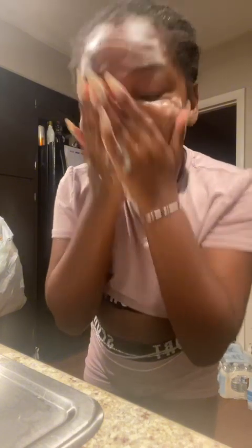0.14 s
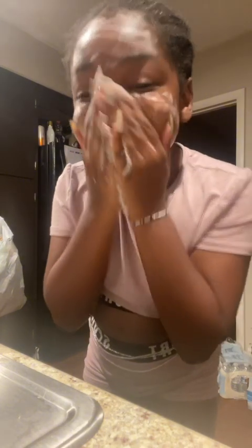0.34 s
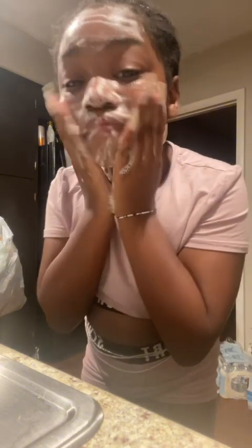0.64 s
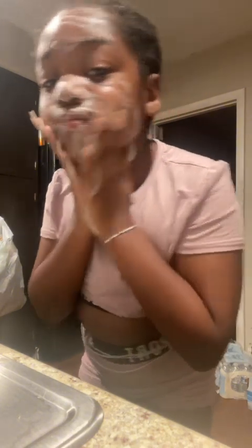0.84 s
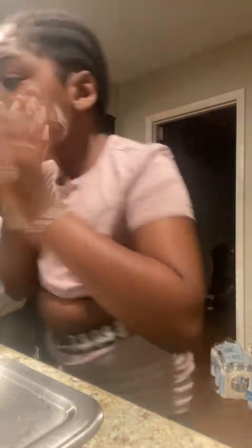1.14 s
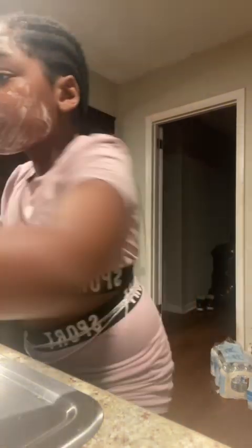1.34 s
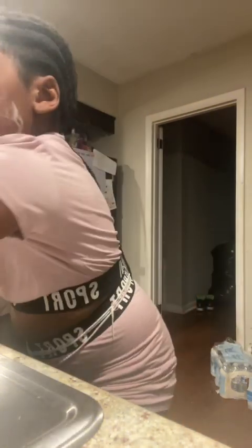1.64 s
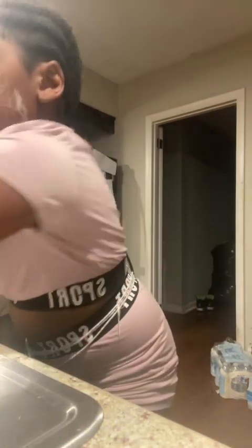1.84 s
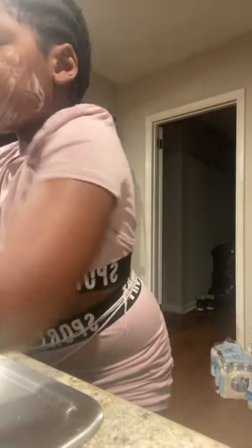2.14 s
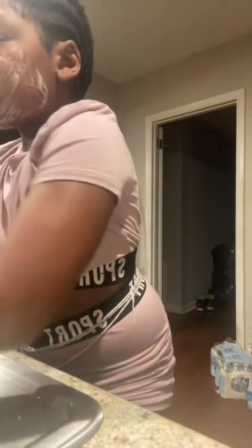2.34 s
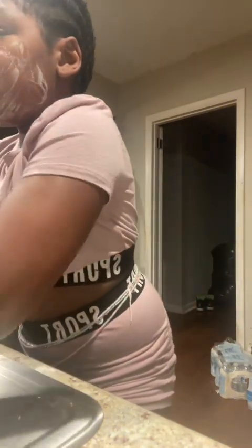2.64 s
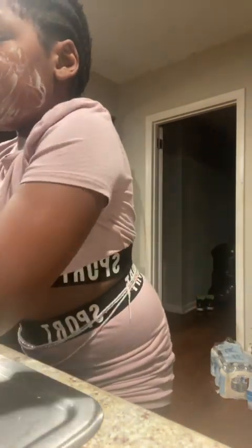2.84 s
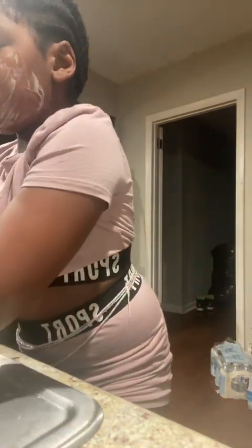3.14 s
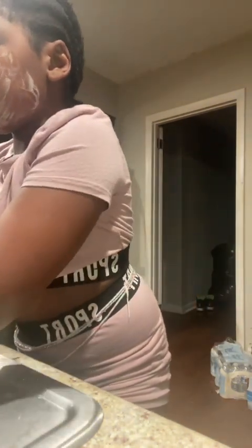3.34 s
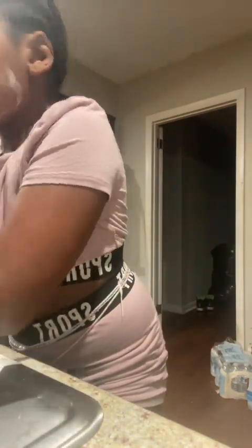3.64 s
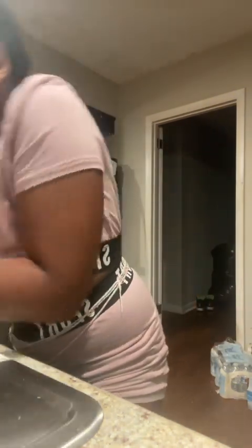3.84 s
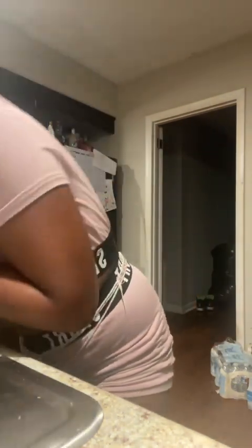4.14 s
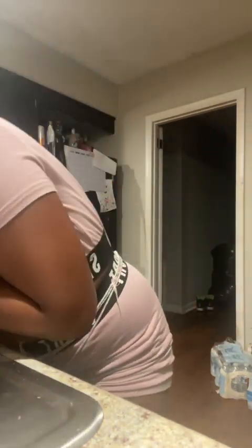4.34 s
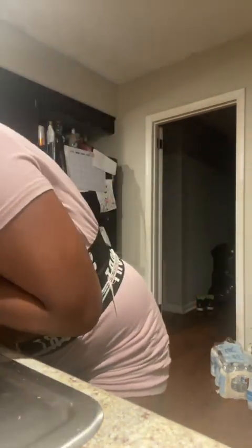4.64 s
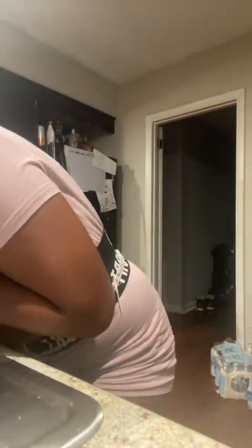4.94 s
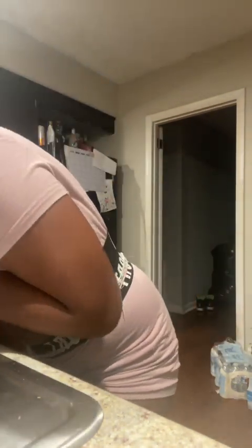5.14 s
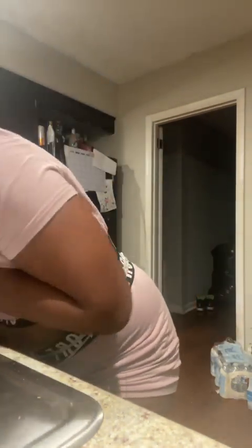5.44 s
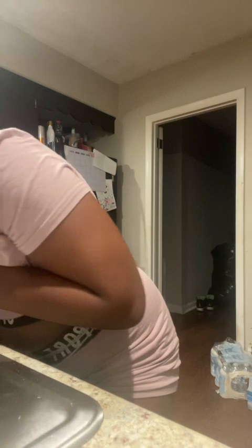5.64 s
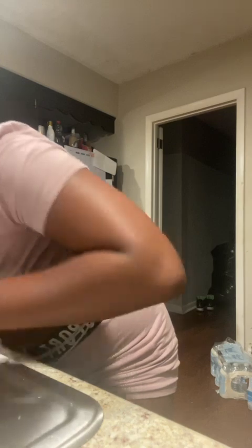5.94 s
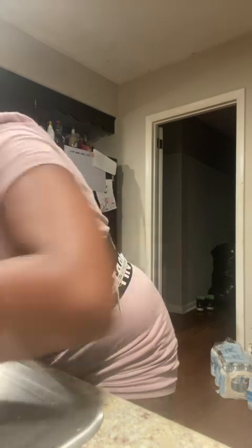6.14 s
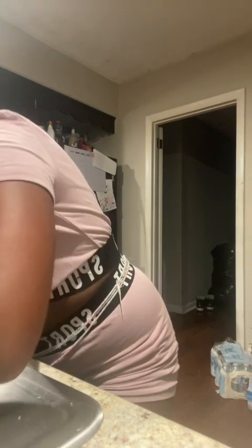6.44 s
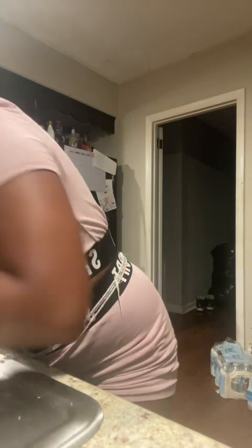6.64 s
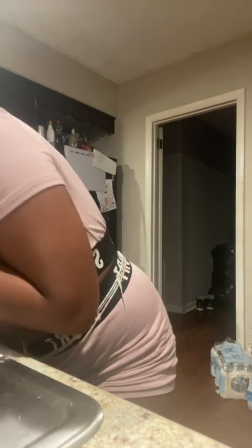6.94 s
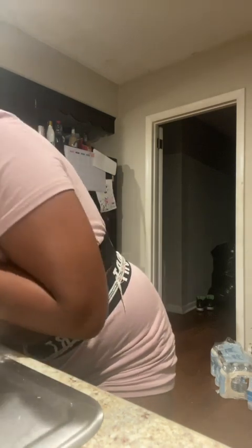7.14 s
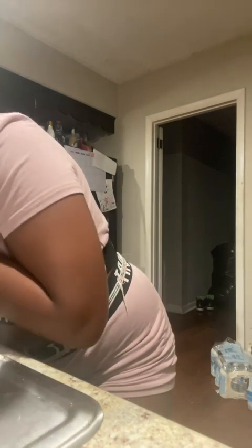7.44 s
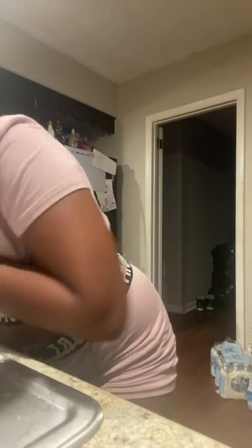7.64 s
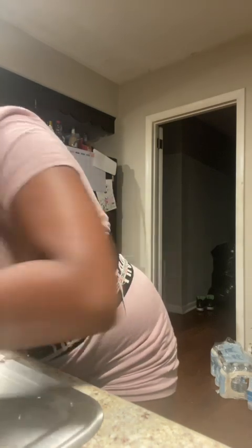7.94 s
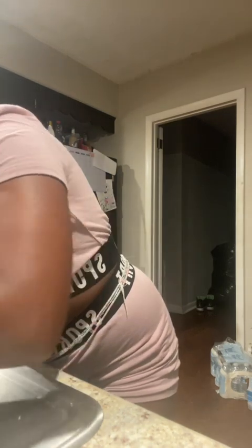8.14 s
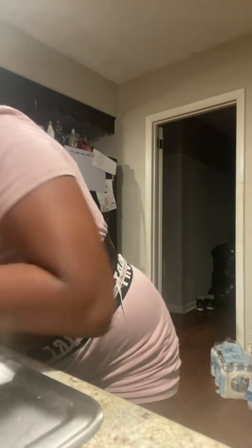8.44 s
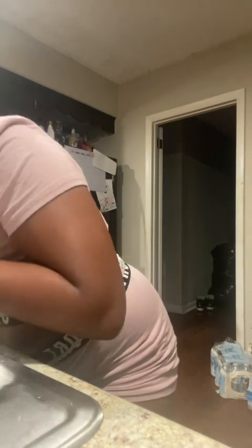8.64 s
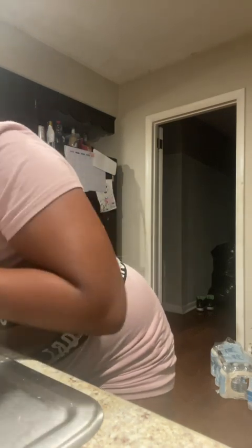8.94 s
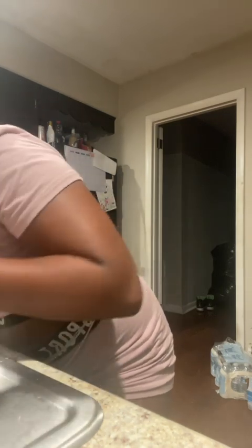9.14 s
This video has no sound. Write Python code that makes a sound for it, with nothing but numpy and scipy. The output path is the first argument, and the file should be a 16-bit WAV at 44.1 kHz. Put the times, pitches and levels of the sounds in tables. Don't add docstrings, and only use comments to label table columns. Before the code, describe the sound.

After a quiet fridge hum, a kitchen tap clunks open and water drums into a steel sink, with handfuls slapping and sloshing down.

```python
import sys
import numpy as np
from scipy import signal
from scipy.io import wavfile
from scipy.ndimage import uniform_filter1d

SR = 44100
rng = np.random.default_rng(int(sys.argv[2]) if len(sys.argv) > 2 else 0)


def convert_level_to_amplitude(level_db):
    exponent = np.asarray(level_db, float) / 20
    return 10 ** exponent


def dump(signal):
    limited = np.clip(np.atleast_2d(signal).T, -1, 1)
    pcm = np.round(limited * 32767).astype(np.int16)
    wavfile.write(sys.argv[1], SR, pcm)


N = 409640

# frequency in Hz, level in dB per Hz.
SPRAY_COLOUR = [(2060, -30), (3500, -1), (5280, -11.5), (5960, -20.5), (8640, -22.5), (9220, -31.5),
                (12300, -30), (14900, -16), (15800, -12.5)]
# pitch in Hz, width in Hz, level in dB.
BASIN_MODES = [(85, 15, -14), (115.5, 14.6, -1.5), (179.5, 21.4, -6), (244.2, 22, -6), (327, 30, -11.5),
               (388, 15.8, -2), (453.2, 20.3, 2), (502.6, 21, -1), (573, 40, -11), (631, 34, -6.5),
               (670, 24, -9.5), (789.7, 73, -7.5), (926, 37, -18.5), (976, 21.7, -8), (1064.3, 15.3, -10),
               (1119.5, 63, -10), (1306, 35, -16), (1409, 45, -17.5), (1511.5, 50, -13.5), (1584, 50, -14),
               (1738, 83, -25), (1884, 42, -21.5), (2103, 250, -33.5), (2401, 74, -30), (2643, 73, -24),
               (2867, 73, -31.5), (3010, 56, -31.5), (3276, 97, -37), (3625, 160, -43), (3850, 76, -49)]
# pitch in Hz, width in Hz, level in dB.
BOOM_MODES = [(113, 74, -5), (382, 73, 1.5), (668, 97, -0.5), (1175, 42, -14), (1480, 290, -17),
              (2300, 390, -25.5), (2645, 100, -28)]
# pitch in Hz, width in Hz, level in dB.
LEVER_MODES = [(102.3, 62, -5), (398, 133, 8.5), (620, 62, 2), (980, 250, -9), (1500, 600, -17.5),
               (2900, 920, -45)]
# start in seconds, slap peak in dB, then droplets and mist
# in dB relative to the slap.
DUMPS = [(3.866, -51, -10, -20), (3.918, -49, -21, -29), (3.9306, -66, 3, -4), (3.954, -47, -15, -13),
         (3.989, -62, 1, -3), (4.019, -45, -17, -21), (4.212, -48.5, -9, -16), (4.350, -52, -14, -22),
         (4.39, -60, -3, 0), (4.434, -37.5, -21, -21), (4.419, -32, -28, -34), (4.497, -49, -9, -11),
         (5.0796, -44, -27, -21), (5.319, -50, -24, -29), (5.364, -64, 0, -11), (5.406, -53, -9.5, -19),
         (5.446, -59, -7.5, 1), (5.4575, -47, -15, -26.5), (5.464, -52, 3, -8), (5.4915, -31, -19, -17),
         (5.523, -36, -20, -32), (5.546, -67.5, 0, -2), (6.474, -51.5, -25, -26), (6.595, -47, -11, -23),
         (6.679, -51.5, -21, -34), (6.74, -45, -13, -4), (7.072, -46.5, -25, -27), (7.1265, -48, -22, -22),
         (8.39, -58, -12, -10), (8.427, -50, -8, -24)]
# start in seconds, slap
# peak in dB, then droplets and mist
SPITS = [(1.509, -70.5, 3, -20), (1.757, -47.5, -19, -4), (1.9166, -57, -13, -22), (1.9534, -59, 4, 16),
         (2.041, -49, -10, -12), (2.148, -65, 3, 6), (2.161, -62, 9, -7), (2.263, -63, -3, -12),
         (2.2795, -50, -20, -28), (2.333, -60, -3, -17), (2.394, -49, -20, -32), (2.459, -60, 0, -19),
         (2.515, -55, -16, -25), (2.587, -45, -13, -30), (2.6024, -42, -22, -42), (2.756, -61, -2, -18),
         (2.828, -43, -23, -21), (2.855, -59, -2, -9), (2.914, -46.5, -20, -30), (2.924, -62, 5, -8),
         (2.983, -63, -1, -12), (3.024, -59, -1, -7), (3.241, -47, -18, -29), (3.32, -65, 0, -17),
         (3.605, -67, -6, 7), (3.6735, -66, 7, -12), (3.842, -65, -6, 2), (4.29, -46, -7, -39),
         (8.216, -69, 4, -13)]
# slap pitch in Hz at about -50 dB, Hz higher per dB, thud in dB
# relative to the slap, time to fall 60 dB in seconds.
ON_HANDS = (3200, 43.5, -10, 0.13)
ON_STEEL = (3220, 9.2, 8.4, 0.024)
# start in seconds, length in seconds, level in dB,
# upper against lower boom in dB, counter rumble in dB.
SLOSHES = [(1.905, 0.046, -20, -7, -30), (3.86, 0.12, -24.5, 2, -36), (4.07, 0.03, -27.5, 5, -29.5),
           (4.18, 0.26, -31, 4.5, -40), (4.36, 0.15, -24, 2, -29), (4.98, 0.12, -29, 0.5, -41.5),
           (5.33, 0.072, -30, -2.5, -42), (5.39, 0.05, -24, -10.5, -34), (5.46, 0.049, -19.5, -10, -28.5),
           (6.67, 0.068, -27, 3.5, -41.5), (6.725, 0.061, -24.5, -6.5, -32.5),
           (7.05, 0.11, -29.5, 7, -31.5), (8.28, 0.08, -27, 2, -41), (8.38, 0.16, -28, 4.5, -34)]
# start in seconds, length in seconds, level in dB,
# upper against lower modes in dB, counter rumble in dB.
RATTLES = [
    (1.51, 0.023, -20, 2.5, -19),
    (1.56, 0.027, -40, 6, -27),
    (1.61, 0.046, -30, 1, -22),
    (1.68, 0.093, -36.5, 8, -29),
]
# start in seconds, peak in dB, pitch in Hz.
KNOCKS = [(1.918, -9.5, 545), (1.931, -11.5, 596), (1.924, -16, 600), (1.942, -16.5, 494),
          (1.949, -14, 562), (1.955, -15, 422), (1.963, -16, 382), (3.928, -19.5, 514), (4.008, -14.5, 615),
          (4.216, -14.5, 682), (4.349, -16.5, 670), (4.377, -7, 652), (4.419, -20, 670),
          (4.438, -12.5, 674), (4.446, -14, 600), (4.453, -19, 560), (4.5, -18, 382), (4.994, -23.5, 554),
          (5.019, -17.5, 398), (5.082, -11.5, 364), (5.32, -17, 637), (5.415, -6, 370), (5.424, -14, 400),
          (5.434, -16.5, 380), (5.466, -13.5, 640), (5.485, -17, 620), (5.493, -3.5, 655),
          (6.742, -16, 500), (6.762, -20, 400), (6.787, -20, 400), (6.776, -19, 417), (7.074, -22, 668),
          (7.083, -20, 600), (7.128, -12.5, 637), (8.305, -21, 390), (8.322, -22, 420), (8.33, -19, 400),
          (8.416, -21, 480), (8.545, -22, 450), (8.408, -18, 645), (8.464, -18.5, 523)]
# start in seconds, peak in dB, pitch in Hz.
CLUNKS = [(1.510, -29, 700), (1.522, -17, 448), (1.531, -21, 563), (1.539, -20, 440), (1.548, -24, 498),
          (1.570, -29, 634), (1.618, -19.5, 560), (1.644, -25, 620), (1.7455, -12, 637), (1.7495, -7, 583)]
# start in seconds, peak in dB, pitch in Hz,
# time to fall 60 dB in seconds.
THUMPS = [(0.972, -30.5, 221, 0.1), (1.757, -18, 350, 0.06), (0.983, -21.5, 80.5, 0.13),
          (1.104, -23, 52.4, 0.08), (1.498, -18, 69.4, 0.07), (1.558, -3.5, 70.5, 0.072),
          (1.599, -19.5, 51.5, 0.24), (1.643, -15.5, 112.3, 0.19), (1.987, -23, 101.4, 0.13),
          (2.05, -22, 105, 0.097), (2.15, -21, 113, 0.13), (4.436, -25, 123, 0.24), (5.514, -21, 113, 0.29)]
# start in seconds, peak in dB, pitch in Hz, width in Hz.
FIZZ = [(1.56, -68, 12000, 300), (1.645, -70, 12000, 297), (1.759, -60, 8550, 1300),
        (4.4983, -54, 9450, 1900), (5.4915, -57, 10600, 1500), (5.466, -44, 5900, 1500),
        (5.4915, -52, 13200, 1500), (6.743, -54, 5600, 900), (6.745, -34, 1100, 700),
        (4.43, -42, 2600, 1500), (4.415, -56, 6500, 2500), (8.39, -58, 5500, 1500),
        (8.428, -42, 6000, 1600), (2.603, -36, 3700, 800), (3.6735, -57.5, 7800, 900),
        (6.598, -59, 7600, 1500), (1.9, -42, 1700, 1400), (1.8, -38, 1150, 960), (6.742, -61, 9000, 2000),
        (4.42, -31.5, 4000, 1700), (8.309, -53, 4100, 700), (5.524, -55, 8300, 1800),
        (4.438, -44, 5000, 1200), (1.62, -40.5, 1000, 810), (1.646, -41, 1100, 900),
        (1.92, -36, 1300, 1200), (4.292, -47, 4800, 1300)]
# start in seconds, peak in dB, pitch in Hz,
# width in Hz.
TICKS = [(1.510, -50, 2500, 400), (1.524, -46.5, 2900, 500), (1.7447, -36, 1720, 900),
         (1.763, -43, 3200, 900), (1.9537, -50, 9500, 5000), (1.954, -46, 15000, 2500),
         (4.3901, -56, 15100, 2000), (6.7405, -50, 14200, 2500), (2.0385, -58, 8000, 4000),
         (2.1472, -58, 7000, 4000), (2.602, -36, 3750, 700), (2.8297, -44, 3600, 900),
         (2.874, -54, 6500, 2500), (2.925, -52, 5500, 1500), (4.3762, -38, 2400, 1500),
         (4.415, -51, 6000, 3000), (4.4202, -26, 3300, 2200), (4.437, -36, 2600, 1500),
         (4.4984, -56, 11000, 6000), (5.0796, -41, 2360, 1800), (5.319, -40, 2000, 1500),
         (5.4647, -27, 2290, 900), (5.465, -43, 5500, 3000), (5.4911, -30, 2600, 2500),
         (5.4915, -45, 12000, 6000), (5.5231, -29, 1900, 1800), (5.5235, -43, 4500, 3000),
         (5.547, -50, 15500, 1500), (6.596, -54, 6000, 3500), (6.606, -55, 6500, 3500),
         (6.7398, -50, 9000, 6000), (7.0745, -42, 2800, 1500), (7.1264, -40.5, 2900, 1500),
         (8.41, -40, 2200, 1500), (8.427, -48, 5000, 2500)]
# frequency in Hz, level in dB per Hz.
AIR_COLOUR = [(15, -55.5), (25, -28.5), (40, -12.5), (65, -8.5), (87, -7.5), (135, -17), (172, -13.5),
              (204, -22), (281, -22), (405, -17), (436, -13.5), (518, -22.5), (1250, -32), (1480, -36),
              (8600, -68.5), (11200, -106), (18900, -120)]
# pitch in Hz, width in Hz, height in dB.
AIR_MODES = [(110.75, 7.7, 13.2), (163.6, 12, 12.6), (282.7, 36, 8), (436, 200, 3.5), (596, 59, 9.8),
             (1310, 31, 4.1), (3600, 8, 8.9)]
# pitch in Hz, level in dB.
FRIDGE_TONES = [
    (59.24, -39),
    (57.92, -43),
    (27.5, -62),
]
# start in seconds, peak in dB, pitch in Hz.
RUBS = [
    (0.3044, -52, 2620),
    (0.4753, -55.5, 2840),
    (0.6794, -57.5, 2350),
]
# frequency in Hz, level in dB per Hz.
MIC_COLOUR = [(3000, -33.5), (5500, -20), (7000, -9), (8600, -18), (9500, -8.5), (12000, -6.5), (14000, -9),
              (15800, -10.5)]


def stream():
    opening_s, drum_db = 0.018, -32
    surge_db, surge_s = -3, 0.027
    since, spray_db = flow()
    opened = np.minimum(since / opening_s, 1)
    level = opened * convert_level_to_amplitude(drum_db + surge_db * np.exp(-since / surge_s))
    push = drops(count=N, per_s=5000, spread_db=3.0)
    drum = np.zeros(N)
    for k, (hz, width, db) in enumerate(BASIN_MODES):
        ring = resonate(resonate(push * wander(hz), hz, width), hz, 3 * width)
        drum += (-1) ** k * convert_level_to_amplitude(db) * ring
    spray = hiss(lambda hz: read(SPRAY_COLOUR, hz), size=256, patchy_db=1.6, flicker_db=0.9)
    return level * (evened(drum) + convert_level_to_amplitude(spray_db) * spray)


def flow():
    open_s, spray_db = 1.742, -36
    since = np.maximum(np.arange(N) / SR - open_s, 0)
    rinse_db = 3.5 * np.exp(-since / 1.5)
    late_db = 20 * np.exp(-since / 0.06)
    return since, spray_db + rinse_db - late_db


def wander(hz):
    step, wander_s = 200, 0.06
    slow = uniform_filter1d(rng.standard_normal(N // step + 2), size=round(wander_s * SR / step))
    depth_db = 2.2 / (1 + (hz / 900) ** 2)
    return convert_level_to_amplitude(depth_db * np.interp(np.arange(N) / step, np.arange(len(slow)), evened(slow)))


def droplets():
    since, spray_db = flow()
    busy = (since > 0) * convert_level_to_amplitude(2.8 * (spray_db - spray_db.max()))
    t, out = np.arange(900) / SR, np.zeros(N)
    for hz in np.geomspace(3500, 9000, num=10):
        fall_db = -60 * t / 0.03 - 11 * np.log2(hz / 3500)
        tick = band(rng.standard_normal(len(t)), hz, 1500) * convert_level_to_amplitude(fall_db)
        out += signal.oaconvolve(drops(count=N, per_s=26, spread_db=3.4), tick)[:N]
    return convert_level_to_amplitude(-67) * busy * evened(out)


def landing(db, droplet_db, mist_db, surface):
    hz, hz_per_db, thud_db, t60 = surface
    slap = splash(db, hz + hz_per_db * (db + 49.5), t60, width=1820)
    thud = splash(db + thud_db, 1950, 0.97 * t60, width=1600)
    drop_hz = 6950 * (1 + 0.07 * rng.uniform(-1, 1))
    shower = splash(db + droplet_db, drop_hz, 0.048, width=1900)
    mist = splash(db + mist_db, 14900, 0.055, width=2800)
    return slap + thud + shower + mist


def splash(db, hz, t60, width):
    hold_s, trail_db, trail_longer = 0.003, -13, 2.2
    t = np.arange(5000) / SR
    ring = evened(band(drops(count=len(t), per_s=12000, spread_db=4.0), hz, width))
    fall_db = -60 * np.maximum(t - hold_s, 0) / t60
    fall = convert_level_to_amplitude(fall_db) + convert_level_to_amplitude(trail_db + fall_db / trail_longer)
    shower = 0.38 * ring * fall * (1 - np.exp(-t / 0.0004))
    return convert_level_to_amplitude(db) * (shower + convert_level_to_amplitude(-8) * crack(hz, width, count=len(t)))


def crack(hz, width, count):
    ring = band(band(signal.unit_impulse(count), hz, 1.6 * width), hz, 1.6 * width)
    return ring / abs(ring).max()


def shake(length, db, upper_db, rumble_db, modes, spray_db):
    rise_s, fall_s, rumble_fall_s = 0.023, 0.012, 0.04
    t = np.arange(10000) / SR
    rise, after = np.minimum(t / rise_s, 1) ** 2, np.maximum(t - length, 0)
    push = drops(count=len(t), per_s=3000, spread_db=2.5)
    rings = [convert_level_to_amplitude(mode_db) * evened(band(push, hz, 1.7 * width)) for hz, width, mode_db in modes]
    boom = rings[1] * convert_level_to_amplitude(-upper_db / 2) + sum(rings[2:]) * convert_level_to_amplitude(upper_db / 2)
    grit = evened(band(drops(count=len(t), per_s=6500, spread_db=5.5), 4800, 3500))
    boom = (boom + convert_level_to_amplitude(spray_db) * grit) * np.exp(-after / fall_s)
    rumble = convert_level_to_amplitude(rumble_db - 2.5) * evened(rings[0]) * np.exp(-after / rumble_fall_s)
    fade_out = np.minimum(t[::-1] / 0.02, 1)
    return rise * (convert_level_to_amplitude(db - 8.5) * boom + rumble) * fade_out


def knock(db, hz):
    t60 = 0.027 * convert_level_to_amplitude(-0.12 * (db + 18.5))
    return 3.2 * blow(db, hz, t60, rise_cycles=2.03, partner=0.852)


def thump(db, hz, t60):
    return 2.2 * blow(db, hz, t60, rise_cycles=0.72, partner=1.25)


def blow(db, hz, t60, rise_cycles, partner):
    t = np.arange(round(t60 * SR) + 99) / SR
    pair = np.sin(2 * np.pi * hz * t) + 0.38 * np.sin(2 * np.pi * hz * partner * t)
    return pair * convert_level_to_amplitude(db - 60 * t / t60) * (1 - np.exp(-(t * hz / rise_cycles) ** 2))


def walls(x, t60, start):
    t = np.arange(SR // 2) / SR
    taps = rng.choice([-1., 1.], len(t)) * (rng.random(len(t)) < 0.05)
    tail = taps * convert_level_to_amplitude(-60 * t / t60) * (t > start)
    return signal.oaconvolve(x, tail / np.linalg.norm(tail))[:N]


def kitchen():
    def colour(hz):
        peaks = sum(db / (1 + (2 * (hz - f) / width) ** 2) for f, width, db in AIR_MODES)
        return read(AIR_COLOUR, hz) + peaks
    out = convert_level_to_amplitude(-37.5) * hiss(colour, size=4096, patchy_db=1.45, flicker_db=0.8)
    t = np.arange(N) / SR - 5.8
    for hz, db in FRIDGE_TONES:
        out += convert_level_to_amplitude(db - 2) * np.sqrt(2) * np.cos(2 * np.pi * hz * t)
    for s, db, hz in RUBS:
        rub = evened(band(rng.standard_normal(1500), hz, 400)) * np.hanning(1500)
        add(out, s, convert_level_to_amplitude(db - 9.5) * rub)
    return out


def hiss(db_of, size, patchy_db, flicker_db):
    frames, hz = 4 * N // size + 5, np.fft.rfftfreq(size, 1 / SR)
    a, b, patches = rng.standard_normal((frames, len(hz), 3)).T
    patches = uniform_filter1d(uniform_filter1d(patches, size=10, axis=0), size=10, axis=1)
    flicker = flicker_db * rng.standard_normal(frames)
    field = db_of(hz)[:, None] + patchy_db * evened(patches) + flicker
    noise = signal.istft((a + 1j * b) * convert_level_to_amplitude(field), nperseg=size, noverlap=3 * size // 4)[1]
    return evened(noise[:N])


def drops(count, per_s, spread_db):
    size_db = spread_db * np.minimum(rng.exponential(1, count), 5)
    size = convert_level_to_amplitude(size_db) * rng.choice([-1, 1], count)
    return evened(size * (rng.random(count) < per_s / SR))


def resonate(x, hz, width):
    pole = np.exp((2j * hz - width) * np.pi / SR)
    return 2 * signal.lfilter([1 - abs(pole)], [1, -pole], x).real


def band(x, hz, width):
    return resonate(resonate(resonate(x, hz, width), hz, 0.73 * width), hz, 2.1 * width)


def evened(x):
    return x / np.sqrt(np.mean(x ** 2) + 1e-20)


def read(points, hz):
    f, value = np.transpose(points)
    return np.interp(np.log(hz + 1), np.log(f + 1), value)


def add(mix, s, sound):
    part = mix[round(s * SR):][:len(sound)]
    part += sound[:len(part)]


def scene():
    steady = stream() + droplets() + kitchen()
    events, blows = np.zeros(N), np.zeros(N)
    for rows, surface in ((DUMPS, ON_STEEL), (SPITS, ON_HANDS)):
        for s, *levels in rows:
            add(events, s, landing(*levels, surface))
    for s, *load in SLOSHES:
        add(events, s, shake(*load, BOOM_MODES, spray_db=-41.5))
    for s, *load in RATTLES:
        add(events, s, shake(*load, LEVER_MODES, spray_db=-56))
    for s, db, hz in KNOCKS + CLUNKS:
        add(blows, s, knock(db, hz))
        add(events, s, splash(db - 17.5, 1063, 0.04, width=820))
    for s, *nudge in THUMPS:
        add(blows, s, thump(*nudge))
    for s, db, hz, width in FIZZ:
        add(events, s, splash(db, hz, 0.045, width))
    for s, db, hz, width in TICKS:
        add(events, s, convert_level_to_amplitude(db) * crack(hz, width, count=600))
    dull = resonate(events + convert_level_to_amplitude(-7) * blows, 0, 2 * 4500) / 2
    echo = walls(dull, t60=0.34, start=0.008)
    return (steady + events + blows + convert_level_to_amplitude(-6) * echo)[None]


def band_limit(x):
    return signal.sosfilt(signal.butter(12, 16450, fs=SR, output="sos"), x)


def record(dry):
    mic_hiss = hiss(lambda hz: read(MIC_COLOUR, hz), size=512, patchy_db=1.0, flicker_db=0.7)
    noisy = dry + convert_level_to_amplitude(-82) * mic_hiss
    ceiling, edge_hz = 0.62, 15830
    soft = ceiling * np.tanh(noisy / ceiling) * signal.windows.tukey(N, 400 / N)
    low_pass = signal.firwin(1023, edge_hz, window=("kaiser", 9), fs=SR)
    finished = signal.oaconvolve(soft, low_pass[None], "same")
    return band_limit(finished)


dry = scene()
out = record(dry)
dump(out)
```